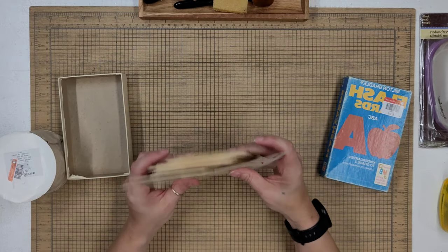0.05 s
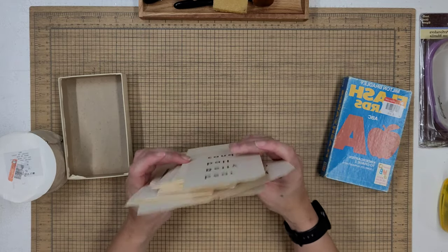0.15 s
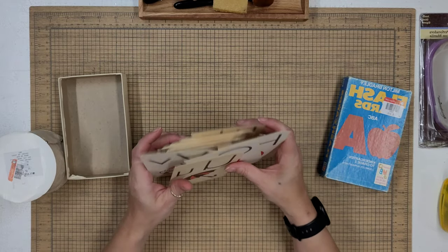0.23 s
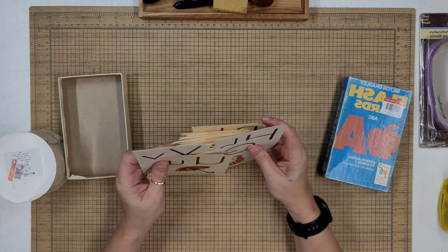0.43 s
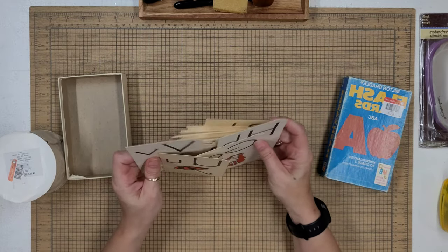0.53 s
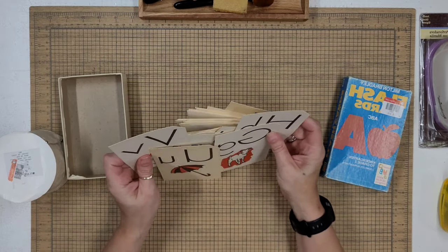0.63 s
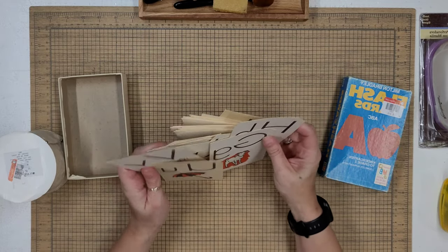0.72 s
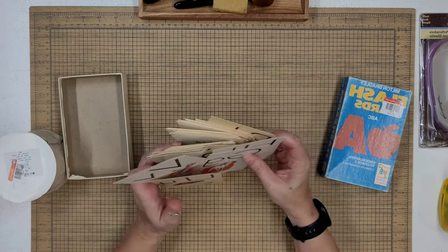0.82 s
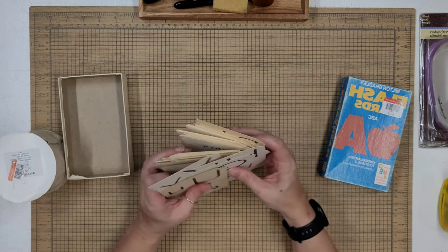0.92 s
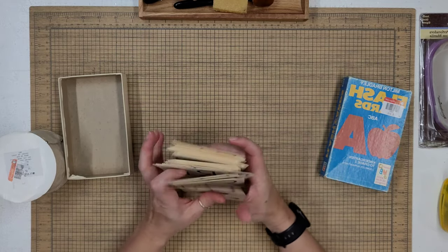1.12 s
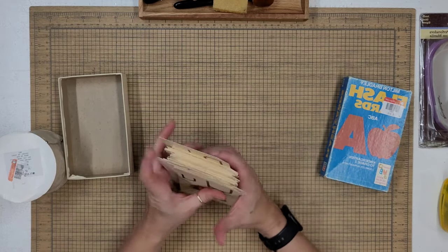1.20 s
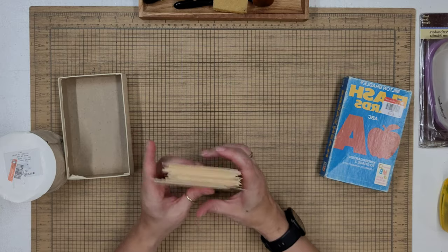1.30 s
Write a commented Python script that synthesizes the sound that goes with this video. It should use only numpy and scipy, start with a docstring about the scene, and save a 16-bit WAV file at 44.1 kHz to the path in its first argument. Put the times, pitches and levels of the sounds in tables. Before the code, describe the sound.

Stiff cards clack hollowly and slide together as hands gather them into a stack.

```python
"""Hollow clacks, one of them hard, and a grainy hiss: two hands gather a loose stack of stiff cards.
Edges knock together and ring; faces slide over each other, with brief rasps and corner ticks.
The heavier knocks thump the table below. Near surfaces and a small quiet room answer the cards
briefly, over low room noise with a faint whine."""
import sys
import numpy as np
from scipy import signal
from scipy.fft import rfft, irfft
from scipy.io import wavfile

SR = 44100
rng = np.random.default_rng(int(sys.argv[2]) if len(sys.argv) > 2 else 0)


def persist_wave(psi):
    """Save psi, clipped to +-1, as 16-bit WAV."""
    counts = np.round(np.clip(psi, -1, 1) * 32767).astype(np.int16)
    wavfile.write(sys.argv[1], SR, np.atleast_2d(counts).T)


N = 59535

# hiss spectrum of card faces: freq_hz, density_db
HISS_SPECTRUM = [(800, -43), (3000, -2.5), (5000, -1), (7300, 0), (9000, -7.5), (12500, -1.5),
                 (16000, -10.5)]
HISS_WIDTH, RUB_WIDTH = 1.17, 0.12  # side / mid


def knocks():
    """Each edge contact clacks, cracks and rings on hollowly; a lower cutoff makes it duller."""
    # edge contacts: start_s, level_db, cutoff_hz
    contacts = [(0.094, -51.5, 3020), (0.1987, -25.5, 870), (0.2054, -23, 900.0), (0.2139, -21.5, 820),
                (0.2373, -21.5, 2980), (0.2428, -26.5, 2480), (0.2573, -10, 2570), (0.2592, -10.0, 2180),
                (0.2649, -9.5, 1620), (0.2688, -6, 5720.0), (0.2743, -19.5, 3020), (0.2809, -31, 3620.0),
                (0.3141, -37.5, 1760), (0.3347, -24.5, 2770), (0.42, -38.5, 1310), (0.4455, -45.5, 1300.0),
                (0.53, -50.5, 3590), (0.5892, -27, 1880), (0.6273, -34, 1140), (0.6602, -26.5, 1470),
                (0.6894, -36, 1110.0), (0.8215, -25.5, 2320), (0.8358, -30.5, 1260), (0.8908, -32.5, 1500),
                (0.8996, -31, 2170), (0.9098, -32.0, 1000), (0.9352, -32.0, 1010.0), (0.9459, -40, 840.0),
                (0.9838, -31, 1100), (1.041, -37.5, 1010), (1.093, -38, 1300.0), (1.1084, -21.5, 1810),
                (1.1422, -28.5, 1440), (1.1543, -27.5, 1920), (1.1627, -32, 1160.0), (1.1697, -18.0, 2270),
                (1.1742, -22.5, 1600), (1.1853, -15.5, 1624), (1.2131, -40, 1070), (1.234, -36.5, 1180)]
    # quickly damped stack modes: freq_hz, level_db, t60_s
    stack_modes = [(853.6, -1.5, 0.011), (1261, -2.5, 0.0063), (2101, 0, 0.0065), (2627, -15, 0.025),
                   (3030, -6, 0.0073)]
    # hollow resonances driven by the clack: freq_hz, gain_db, t60_s
    hollows = [(345.6, 14, 0.098), (581.5, 9, 0.117), (747, 13.5, 0.078), (861.4, 8.5, 0.036),
               (901.7, 5.5, 0.048), (1048.4, 15, 0.082), (1174, -4, 0.051), (1355, -1, 0.087),
               (1439, 10.5, 0.059), (1891, 3, 0.025), (2112, -2, 0.064), (2280, -1.5, 0.071),
               (3426, 8, 0.018), (4076, 13.5, 0.035)]
    crack_db, crack_decay_s = -4.5, 0.004
    radiate_hz = 522  # cards radiate little below this
    out, t = np.zeros((2, N)), np.arange(SR // 4) / SR
    clack = steep(ring(stack_modes, t), radiate_hz, "high")
    body = clack + sum(undb(db) * resonate(clack, hz, q=np.pi * hz * t60_s / np.log(1000))
                       for hz, db, t60_s in hollows)
    for start_s, level_db, cutoff_hz in contacts:
        burst = spread(rng.standard_normal((2, len(t))), HISS_WIDTH) * np.exp(-t / crack_decay_s)
        crack = undb(crack_db) * steep(burst, radiate_hz, "high")
        body_peak = np.abs(steep(body, cutoff_hz, "low")).max()
        add(out, start_s, undb(level_db) / body_peak * steep(body + crack, cutoff_hz, "low"))
    return out


def slides():
    """Each slide swells and dies away: edges scrape, faces hiss, fingers rub the stack hollowly."""
    # card slides: peak_s, rise_s, fall_s, scrape_db, hiss_db, rub_db
    strokes = [(0.011, 0.016, 0.02, -69, -60.5, -58.5), (0.066, 0.027, 0.027, -61, -51, -64.5),
               (0.211, 0.0094, 0.031, -56, -54, -47.5), (0.274, 0.033, 0.052, -41.5, -49, -35.5),
               (0.352, 0.02, 0.0077, -45.5, -56, -39.5), (0.393, 0.025, 0.017, -46, -61, -51),
               (.432, 0.02, 0.019, -66.5, -63, -56.5), (.588, 0.032, 0.039, -51.5, -49, -62.5),
               (.68, 0.046, 0.069, -59, -61, -63.5), (0.783, .026, 0.021, -44, -51.5, -51.5),
               (0.823, 0.038, 0.039, -49, -52, -50.5), (0.898, 0.071, 0.11, -57.5, -56.5, -51.5),
               (0.944, 0.008, 0.031, -52, -53.5, -46.5), (1.039, 0.021, 0.095, -54.5, -50.5, -67),
               (1.106, 0.01, 0.024, -47, -51, -68), (1.154, 0.016, 0.048, -45, -54.5, -45),
               (1.21, 0.015, 0.026, -57, -59, -46.5), (1.321, 0.09, 0.021, -66.5, -63, -63)]
    # edge scrape spectrum: freq_hz, density_db
    scrape_spectrum = [(300, -39.5), (700, -0.5), (1100, -4), (1900, -0.5), (3500, -9), (6000, -17.5),
                       (16000, -32.5)]
    # finger rub spectrum: freq_hz, density_db
    rub_spectrum = [(30, -20), (70, -6.5), (140, -8), (200, -6), (350, -3), (500, -6), (800, -4),
                    (1300, -7.5), (4000, -31.5)]
    t, power = np.arange(N) / SR, np.zeros((3, N))
    for peak_s, rise_s, fall_s, *levels_db in strokes:
        slope_s = np.where(t < peak_s, rise_s, fall_s)
        swell = np.exp(-np.abs((t - peak_s) / slope_s) ** 1.62)
        power += (undb(levels_db)[:, None] * swell) ** 2
    scrape_rms, hiss_rms, rub_rms = np.sqrt(power)
    return (scrape_rms * friction(scrape_spectrum, width=0.54)
            + hiss_rms * friction(HISS_SPECTRUM, HISS_WIDTH)
            + rub_rms * friction(rub_spectrum, RUB_WIDTH))


def friction(spectrum, width):
    """Paper fibres catch and let go: dense uneven clicks over a smooth hiss of equal power."""
    grains_per_s, scatter_db = 1800, 3
    clicks = (rng.random((2, N)) < grains_per_s / SR) * rng.standard_normal((2, N))
    clicks *= undb(scatter_db * np.minimum(rng.exponential(size=N), np.pi))
    smooth = rng.standard_normal((2, N))
    return spread(colour(unit(clicks) + smooth, spectrum), width)


def thumps():
    """Soft pushes set the table booming briefly; a longer push sounds deeper."""
    # stack and hands on the table: start_s, peak_db, length_s
    pushes = [(0.207, -44, 0.009), (.260, -24, 0.0055), (0.3, -38, 0.029), (.342, -51, 0.015),
              (.60, -51.5, 0.004), (0.798, -67, 0.0092), (0.938, -48, 0.0033), (1.108, -41, .018),
              (1.176, -34, 0.017)]
    # table modes: freq_hz, level_db, t60_s
    table_modes = [(60, 0, .19), (82, -2, .1), (105, 2, .13), (132, 0, .09)]
    out, t = np.zeros(N), np.arange(SR // 3) / SR
    for start_s, peak_db, length_s in pushes:
        force = np.sin(np.pi * np.minimum(t / length_s, 1)) ** 2
        boom = signal.fftconvolve(force, ring(table_modes, t))[:len(t)]
        add(out, start_s, undb(peak_db) * boom / np.abs(boom).max())
    return out


def ticks():
    """A corner slips off its neighbour with a tiny bright burst."""
    # corner flicks: start_s, level_db
    flicks = [(0.1423, -50), (0.1972, -52.5), (0.2367, -44), (0.269, -40), (0.3478, -41), (.353, -50),
              (0.529, -56.5), (0.941, -49.5), (1.155, -63)]
    decay_s = 0.0049
    envelope, t = np.zeros(N), np.arange(SR // 20) / SR
    for start_s, level_db in flicks:
        add(envelope, start_s, undb(level_db) * np.exp(-t / decay_s))
    return envelope * spread(colour(rng.standard_normal((2, N)), HISS_SPECTRUM), HISS_WIDTH)


def rasps():
    """An edge or fingertip sticks and slips: brief noise gathered round one pitch."""
    # stick-slip bursts: peak_s, half_length_s, pitch_hz, level_db
    slips = [(0.011, 0.017, 550, -60), (0.066, 0.009, 360, -60), (0.098, 0.0054, 1760, -54.5),
             (0.784, 0.012, 1840, -48.5), (0.941, 0.01, 3290, -51.5), (0.957, 0.013, 417, -49.5),
             (1.136, 0.0035, 3770, -47)]
    q = 3.9
    out, t = np.zeros((2, N)), np.arange(N) / SR
    for peak_s, half_length_s, pitch_hz, level_db in slips:
        noise = spread(rng.standard_normal((2, N)), RUB_WIDTH)
        band = unit(resonate(resonate(noise, pitch_hz, q), pitch_hz, q))
        out += undb(level_db) * np.exp(-((t - peak_s) / half_length_s) ** 2) * band
    return out


def room(x):
    """Direct sound, a few side reflections and a short diffuse tail."""
    # side-wall reflections, opposite in left and right: delay_s, gain
    reflections = [(.0021, 0.091), (.0034, 0.046), (.0062, -0.047), (.0097, 0.16), (0.0149, .14)]
    tail_db, t60_s, onset_s = -13, 0.17, 0.0093
    t = np.arange(SR // 2) / SR
    envelope = fade(t, t60_s) * (1 - np.exp(-(t / onset_s) ** 2))
    tail = envelope * spread(rng.standard_normal((2, len(t))), width=0.67)
    response = undb(tail_db) * tail / np.sqrt(np.sum(tail ** 2) / 2)
    for delay_s, gain in reflections:
        response[:, int(delay_s * SR)] += gain, -gain
    return x + signal.fftconvolve(x, response, axes=1)[:, :N]


def air():
    """Quiet room noise with a faint narrow whine."""
    # still-air spectrum: freq_hz, density_db
    air_spectrum = [(25, -13.5), (55, -8), (150, -16.5), (300, -23.5), (800, -14.5), (1500, -19.5),
                    (4000, -22), (9000, -27.5), (16000, -27.5)]
    air_db, whine_db, whine_hz = -66, -72.5, 2908
    whine = unit(resonate(rng.standard_normal(N), whine_hz, q=45))
    noise = spread(colour(rng.standard_normal((2, N)), air_spectrum), width=0.71)
    return undb(air_db) * noise + undb(whine_db) * whine


def undb(db):
    """Decibels to gain."""
    return 10 ** (np.asarray(db) / 20)


def unit(x):
    """Scale to rms 1."""
    return x / np.sqrt(np.mean(x ** 2))


def colour(x, spectrum):
    """Shape by (freq_hz, density_db) points; rms 1."""
    hz, db = np.array(spectrum, float).T
    bins_hz = np.maximum(np.fft.rfftfreq(N, 1 / SR), 1)
    gain = undb(np.interp(np.log(bins_hz), np.log(hz), db))
    return unit(irfft(rfft(x) * gain, N))


def spread(pair, width):
    """Two unrelated signals as stereo mid and side."""
    return (pair[0] + width * np.array([[1], [-1]]) * pair[1]) / np.sqrt(1 + width ** 2)


def fade(t, t60_s):
    """Exponential decay, 60 dB in t60_s."""
    return np.exp(-np.log(1000) * t / t60_s)


def ring(modes, t):
    """Damped sines set off together."""
    return sum(undb(db) * np.sin(2 * np.pi * hz * t) * fade(t, t60_s) for hz, db, t60_s in modes)


def resonate(x, hz, q):
    """One resonance, gain 1 at its centre."""
    return signal.lfilter(*signal.iirpeak(hz, q, fs=SR), x)


def steep(x, hz, kind):
    """Low-pass or high-pass, 24 dB per octave."""
    sos = signal.butter(2, min(hz, SR / 3), kind, fs=SR, output="sos")
    return signal.sosfilt(sos, signal.sosfilt(sos, x))


def add(out, start_s, x):
    """Mix x into out at start_s."""
    i = max(int(start_s * SR), 0)
    n = min(x.shape[-1], N - i)
    out[..., i:i + n] += x[..., :n]


def scene():
    """Cards in the room and dry table thumps, slightly to the right, over room noise."""
    balance_db = -0.6  # left minus right
    handling = room(knocks() + ticks() + slides() + rasps()) + thumps()
    return handling * undb(np.array([[balance_db], [-balance_db]]) / 2) + air()


def record(dry):
    """Thin the deepest bass and cut the top."""
    low_hz, top_hz = 42.6, 15800
    top_cut = signal.ellip(10, 0.2, 80, top_hz, fs=SR, output="sos")
    return signal.sosfilt(top_cut, steep(dry, low_hz, "high"))


dry = scene()
out = record(dry)
persist_wave(out)
```